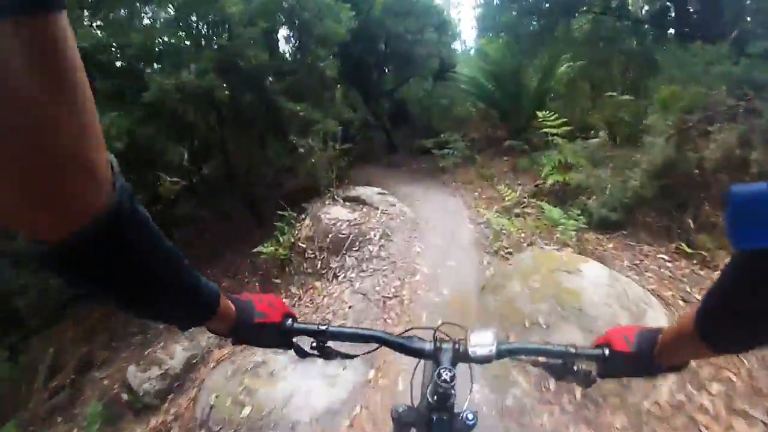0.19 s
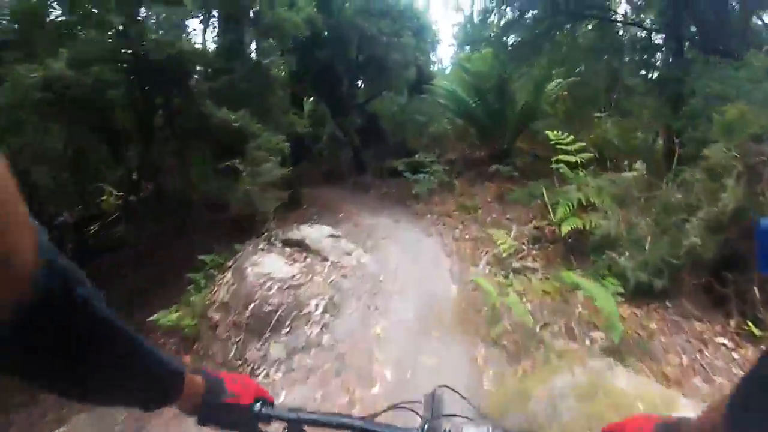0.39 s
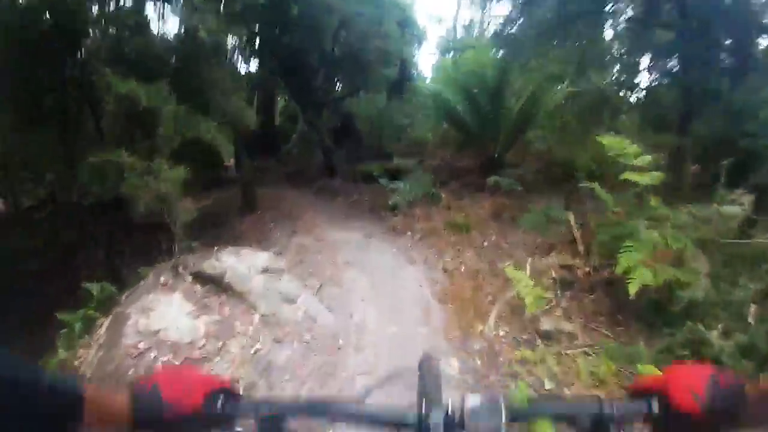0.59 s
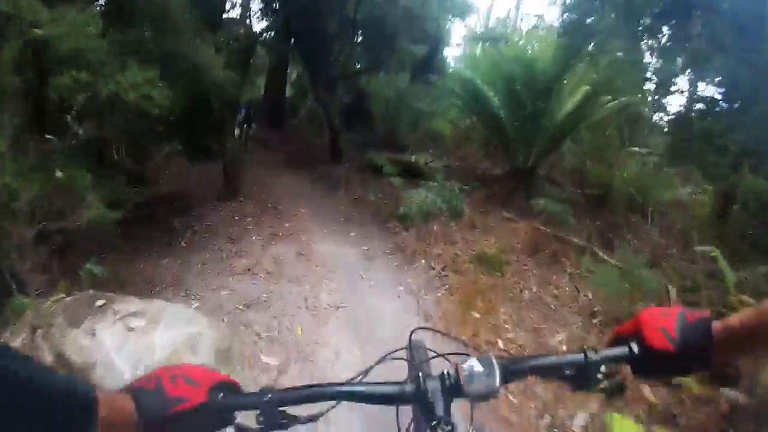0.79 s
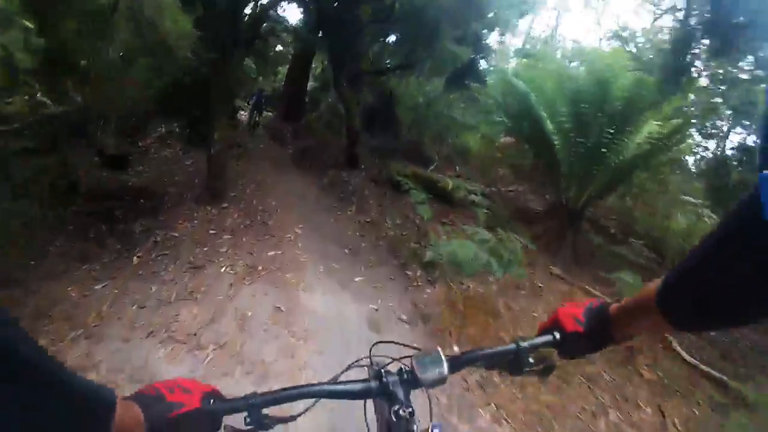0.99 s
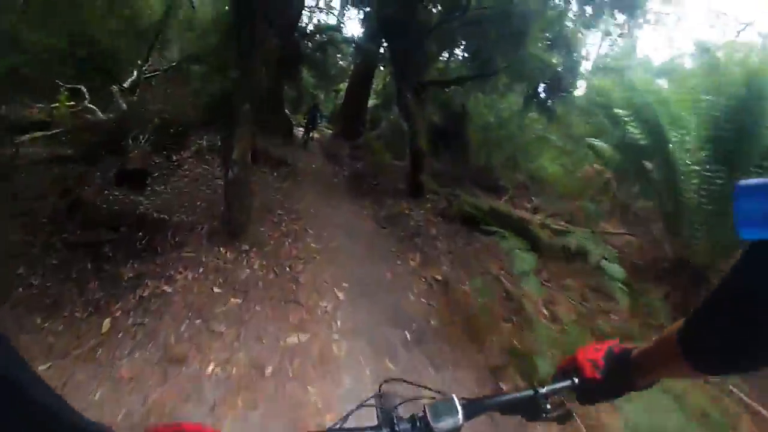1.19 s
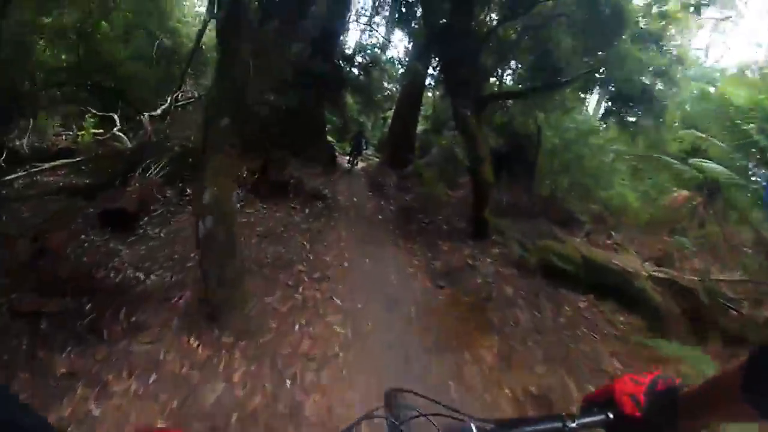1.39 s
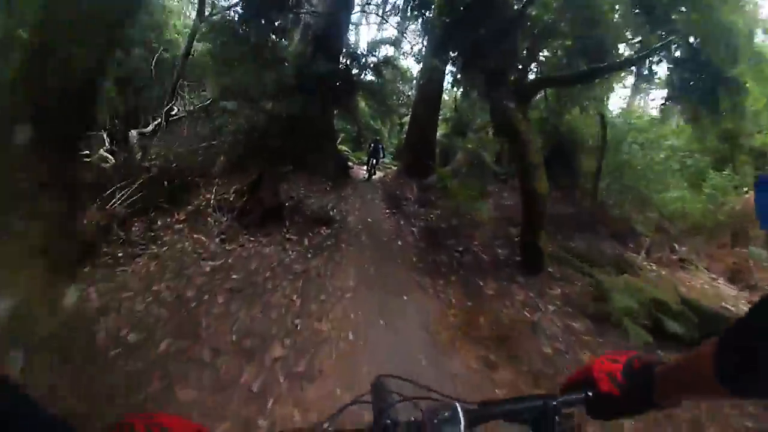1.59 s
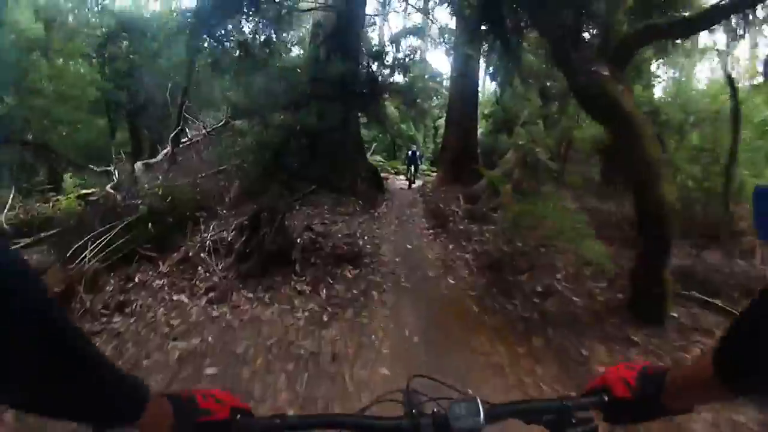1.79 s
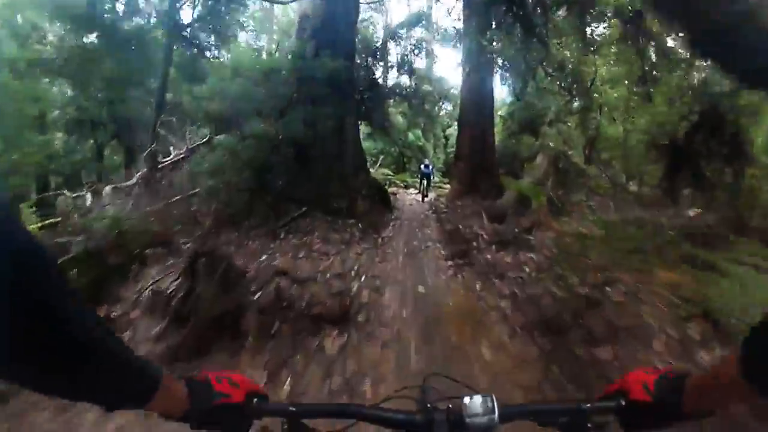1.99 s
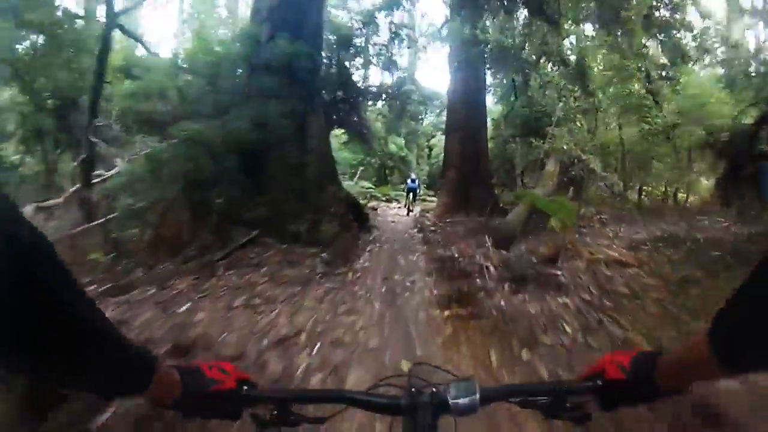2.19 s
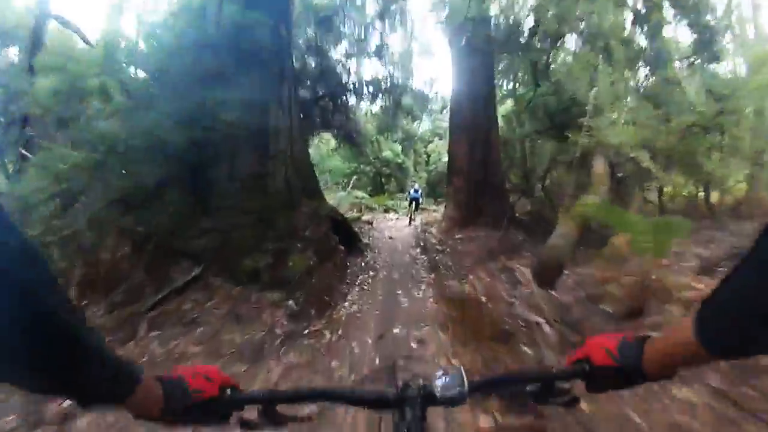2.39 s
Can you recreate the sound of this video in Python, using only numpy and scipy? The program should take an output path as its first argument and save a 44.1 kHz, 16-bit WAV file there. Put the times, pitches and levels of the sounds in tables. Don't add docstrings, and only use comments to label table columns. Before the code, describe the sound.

Muffled bike tyres rumble over dirt and bumps; a few light chain ticks lead to a hard landing knock with a brief crunch, after which the background dips, returns, and rolling continues, close and dry outdoors.

```python
import sys
import numpy as np
from scipy import signal
from scipy.fft import rfft, irfft
from scipy.io import wavfile
from scipy.ndimage import uniform_filter1d

SR = 44100
rng = np.random.default_rng(int(sys.argv[2]) if len(sys.argv) > 2 else 0)


def wrap_up_sound(samples):
    columns = np.atleast_2d(samples).T
    tamed = np.clip(columns, -1, 1)
    steps = np.round(tamed * 32767).astype(np.int16)
    wavfile.write(sys.argv[1], SR, steps)


def natural_amplitude(level_db):
    exponent = np.asarray(level_db, float) / 20
    return 10 ** exponent


N = 108045

# centre in Hz, bandwidth in Hz, level in dB.
CAVITIES = [(505, 540, -7.5), (1019, 560, -4.5), (1427.5, 278, 0), (2059, 580, -3), (2510, 450, -5.5)]
# centre in Hz, bandwidth in Hz, level in dB.
CHINKS = [(3390, 180, -0.5), (4220, 260, -6), (4747, 230, -1), (5695, 540, -1), (6590, 480, -3.5),
          (8100, 810, -10.5), (9920, 690, -12.5)]
KNOCK_S = 0.6977


def rumble():
    # time in seconds, level in dB.
    shake_levels = [(0, -38), (.06, -41), (.25, -41), (.45, -41), (.56, -37), (.64, -33), (.68, -38),
                    (.75, -26), (.86, -33), (.97, -41), (1.2, -42), (1.7, -42), (2.05, -43), (2.45, -41)]
    # centre in seconds, push in full scale, width in milliseconds.
    jolts = [(.068, .06, 24), (.110, -.06, 14), (.195, .05, 16), (.209, -.04, 9), (.226, .07, 14),
             (.244, -.09, 16), (.281, .06, 9), (.298, .14, 8), (.313, -.07, 14), (.405, -.14, 16),
             (.512, .08, 13), (.535, .12, 11), (.605, -.12, 9), (.867, -.19, 11), (1.043, -.14, 9),
             (1.055, .1, 9), (1.076, -.07, 18), (1.431, .12, 10), (1.667, -.05, 14), (1.786, -.07, 14),
             (1.798, -.06, 7), (1.811, .05, 7), (1.832, -.06, 10), (1.850, .07, 14), (1.987, .05, 9),
             (2.173, .05, 7), (2.192, .11, 9), (2.21, -.04, 12), (2.42, .04, 14)]
    # frequency in Hz, density in dB per Hz.
    rumble_colour = [(8.8, -17), (15, -0.5), (34, -3.5), (108, -19), (225, -35.5), (529, -42), (597, -45.5),
                     (900, -51.5), (1170, -54), (1980, -120)]
    rebound_hz, damping_ratio, jolt_stirs = 10.6, 0.69, 4

    t = np.arange(N) / SR
    push = 0
    for centre_s, height, width_ms in jolts:
        push = push + height * np.exp(-np.log(16) * ((t - centre_s) * 1000 / width_ms) ** 2)
    omega = 2 * np.pi * rebound_hz
    mount = signal.bilinear([1, 2 * damping_ratio * omega, 0], [1, 2 * damping_ratio * omega, omega ** 2], SR)
    sprung = signal.lfilter(*mount, push)

    shake = coloured(rumble_colour, patchy_db=2.5, rate=6.5)
    thud_band = signal.butter(2, [60, 190], "band", fs=SR, output="sos")
    jolt_strength = uniform_filter1d(np.abs(push), int(0.017 * SR))
    stirred = shake + signal.sosfilt(thud_band, shake) * jolt_stirs * jolt_strength
    return natural_amplitude(in_time(shake_levels) + 4.0) * stirred * duck() + sprung


def grit():
    # time in seconds, grit level in dB.
    tyre_load = [(0, -57), (.14, -57), (.22, -53), (.34, -54), (.42, -59), (.48, -52), (.69, -48),
                 (.82, -53), (.88, -51), (1.26, -54.5), (1.36, -49), (1.45, -53.5), (1.6, -52.5),
                 (1.75, -55.5), (2.05, -57.5), (2.32, -58), (2.365, -52.5), (2.42, -58)]
    load_db = in_time(tyre_load)
    swing_db = load_db - load_db.mean()
    clump = drift(14.0)
    lower = cavity_grit(CAVITIES[:3], clump)
    upper = cavity_grit(CAVITIES[3:], clump)
    high_grains = grains() * natural_amplitude(0.98 * clump + 1.4 * drift(31.0))
    high = even(resonate(high_grains, CHINKS), 0.25)

    low_mix = lower + natural_amplitude(-0.73 + 0.18 * swing_db) * upper
    return natural_amplitude(load_db - 3.2) * low_mix + natural_amplitude(-64.5 + 0.39 * swing_db) * high


def cavity_grit(cavities, clump):
    struck = grains() * natural_amplitude(1.33 * clump + 1.2 * drift(25.0))
    return even(resonate(resonate(struck, cavities), cavities), 0.091)


def grains():
    per_second, spread_db = 4000, 2.24
    hit = rng.random(N) < per_second / SR
    size = natural_amplitude(spread_db * np.minimum(rng.exponential(1, N), 5))
    return hit * size * rng.choice([-1, 1], N)


def knock():
    # frequency in Hz, level in dB, decay time T60 in seconds.
    shell_modes = [(570, -21, .016), (1030, -24, .012), (1350, -17, .014), (1780, -13, .007),
                   (2170, -16, .015)]
    squash_s, squash_push, squash_rise_ms, squash_fall_ms = 0.6800, 0.3, 5.0, 6.5
    knock_push, knock_rise_ms, knock_fall_ms = -1.9, 1.8, 5.3

    t = np.arange(N) / SR
    from_squash_ms = (t - squash_s) * 1000
    rise = 1 / np.cosh(np.minimum(from_squash_ms / squash_rise_ms * 1.6, 50))
    fall = np.exp(-(from_squash_ms / squash_fall_ms) ** 2 * 0.7)
    squash = squash_push * np.where(from_squash_ms < 0, rise, fall)

    after_ms = np.maximum(t - KNOCK_S, 0) * 1000
    blow = knock_push * (np.exp(-after_ms / knock_fall_ms) - np.exp(-after_ms / knock_rise_ms))
    ring_s = np.maximum(t - KNOCK_S + 0.0003, 0)
    ring = 0
    for hz, db, t60 in shell_modes:
        ring = ring + natural_amplitude(db - 60 * np.minimum(ring_s / t60, 4)) * np.sin(2 * np.pi * hz * ring_s)
    soft_wall = signal.butter(6, 2350, fs=SR, output="sos")
    return squash + signal.sosfilt(soft_wall, blow + ring)


def chain_and_crunch():
    # start in seconds, peak in dB, rattle decay in milliseconds,
    # low cavities in dB.
    tick_events = [(0.0298, -46, 2.4, -2.5), (0.1042, -49, 3.0, -18), (0.2423, -53, 3.0, 5),
                   (0.2783, -59, 2.1, 12.5), (0.3225, -37.5, 3.0, 0.5), (0.5774, -31.5, 3.8, -13.5),
                   (0.5852, -40.5, 3.6, 6), (0.746, -57, 4.9, -4.0), (0.832, -58, 2.4, 16),
                   (0.869, -51, 2.4, 8), (1.037, -56, 3.3, 10), (1.068, -47.5, 3.7, 2.5),
                   (1.143, -56, 5.6, 15), (1.262, -61, 2.7, -14), (1.736, -34, 1.6, -14),
                   (1.8721, -49, 2.4, -11), (2.1257, -48, 2, -4.5), (2.17, -42, 5.6, -4.0),
                   (2.2406, -49.5, 2.4, 1), (2.2875, -51, 3.3, -1), (2.3437, -49, 4.7, 0),
                   (2.3519, -46, 3.7, 5)]
    # start in seconds, peak in dB, rattle decay in milliseconds,
    # low cavities in dB.
    crunch_events = [
        (.636, -52, 6.0, 8),
        (.664, -50, 4.0, 4),
        (.676, -34, 3.5, 9),
        (.683, -43, 2.5, 4),
        (.691, -42, 2.0, 11),
        (.698, -37, 2.2, -9),
        (.702, -44, 2.2, -9),
    ]
    chain = ticks(tick_events, chain_db=8.0, wide_db=-26)
    return chain + ticks(crunch_events, chain_db=-1.0, wide_db=-29)


def ticks(rows, chain_db, wide_db):
    length = 2000
    out, t = np.zeros(N + length), np.arange(length) / SR
    for start_s, peak_db, decay_ms, low_db in rows:
        attack = np.minimum(t / 0.0008, 1)
        burst = rng.standard_normal(length) * attack * np.exp(-t * 1000 / decay_ms)
        peaks = []
        for hz, width, db in CHINKS:
            near_chain = abs(np.log2(hz / 6000)) < 0.2
            peaks.append((hz, width, db + rng.normal(0, 2.5) + chain_db * near_chain))
        high = resonate(burst, peaks) + natural_amplitude(wide_db) * np.diff(burst, prepend=0)
        low = resonate(resonate(burst, CAVITIES[2:]), CAVITIES[2:])
        tick = high / np.abs(high).max() + natural_amplitude(low_db) * low / np.abs(low).max()
        i = int(start_s * SR)
        out[i:i + length] += natural_amplitude(peak_db) * tick
    return out[:N]


def duck():
    depth_db, lag_s, attack_ms, recover_db_per_s = 19.5, 0.0105, 0.99, 127.5
    t = np.arange(N) / SR - KNOCK_S - lag_s
    cut_db = np.where(t > 0, np.maximum(depth_db - recover_db_per_s * t, 0), 0)
    r = np.exp(-1000 / (attack_ms * SR))
    return natural_amplitude(-signal.lfilter([1 - r], [1, -r], cut_db))


def electronics():
    # frequency in Hz, density in dB per Hz.
    hiss_colour = [(1650, -24), (2800, -1.5), (3750, -9.5), (5620, -12), (14000, -14.5), (15350, -19),
                   (15600, -40)]
    # frequency in Hz, level in dB.
    whine_tones = [(6954, -82), (7013, -84), (10429, -87), (10490, -84), (11748, -92), (13966, -92)]
    t = np.arange(N) / SR
    whine = 0
    for hz, db in whine_tones:
        level = natural_amplitude(db + 4.5 + 1.7 * drift(5.0))
        whine = whine + level * np.sin(2 * np.pi * (hz * t + rng.random()))
    return natural_amplitude(-65.5) * coloured(hiss_colour, patchy_db=0.3, rate=8.0) + whine


def coloured(points, patchy_db, rate):
    hz = np.arange(1, N // 2 + 2) * SR / N
    f, db = np.transpose(points)
    colour = natural_amplitude(np.interp(np.log(hz), np.log(f), db, -120, -120))
    spectrum = rfft(rng.standard_normal(N)) * colour
    together, out = drift(rate), 0
    for centre in np.arange(np.log2(f[0]) // 1, np.log2(f[-1]) + 1):
        share = np.cos(np.pi / 2 * np.clip(np.log2(hz) - centre, -1, 1)) ** 2
        band = irfft(spectrum * share, N)
        flicker = natural_amplitude(patchy_db * (together + 1.15 * drift(rate)))
        out = out + even(band * flicker, 0.16) * band.std()
    return rms_one(out)


def resonate(x, peaks):
    out = 0
    for k, (hz, width, db) in enumerate(peaks):
        r = np.exp(-np.pi * width / SR)
        zeros = [(1 - r * r) / 2, 0, (r * r - 1) / 2]
        poles = [1, -2 * r * np.cos(2 * np.pi * hz / SR), r * r]
        out = out + (-1) ** k * natural_amplitude(db) * signal.lfilter(zeros, poles, x + 1e-18)
    return out


def drift(rate):
    r = np.exp(-80 * np.pi * rate / SR)
    slow = signal.lfilter([1], [1, -2 * r, r * r], rng.standard_normal(N // 40 + 2002))[2000:]
    return np.interp(np.arange(N) / 40, np.arange(len(slow)), rms_one(slow))


def even(x, s):
    return x / np.sqrt(uniform_filter1d(x ** 2, int(s * SR)) + 1e-20)


def rms_one(x):
    return x / np.sqrt(np.mean(x ** 2) + 1e-20)


def in_time(rows):
    return np.interp(np.arange(N) / SR, *np.transpose(rows))


def scene():
    ducked = (grit() + electronics()) * duck()
    return (ducked + rumble() + chain_and_crunch() + knock())[None]


def roll_off(x):
    return signal.sosfilt(signal.butter(12, 15600, fs=SR, output="sos"), x)


def record(dry):
    top_cut = signal.cheby2(12, 30, 15900, fs=SR, output="sos")
    return roll_off(signal.sosfilt(top_cut, dry))


dry = scene()
out = record(dry)
wrap_up_sound(out)
```